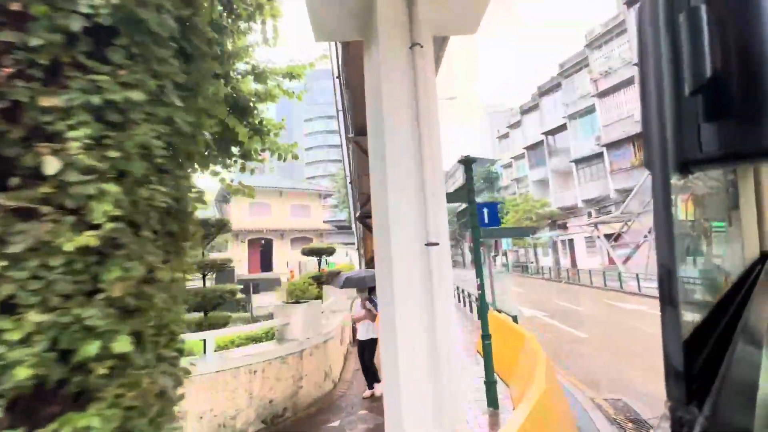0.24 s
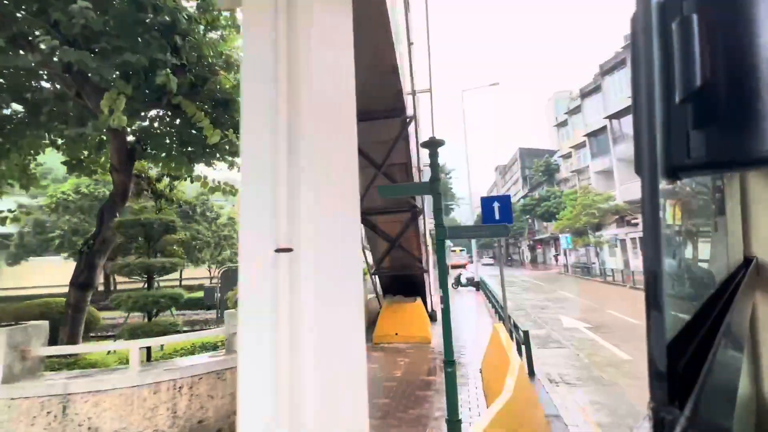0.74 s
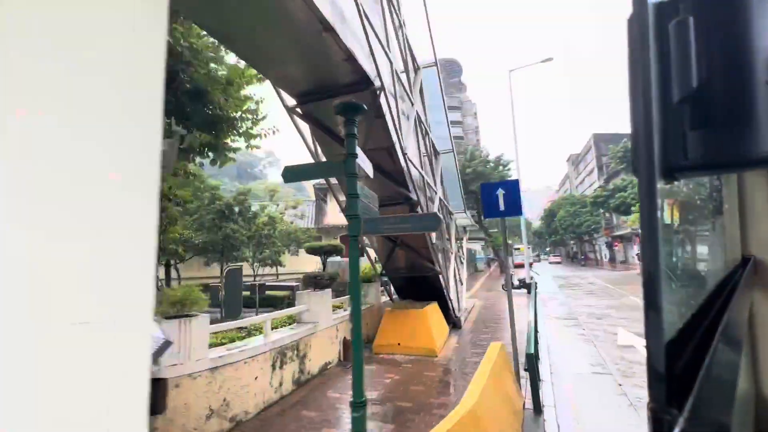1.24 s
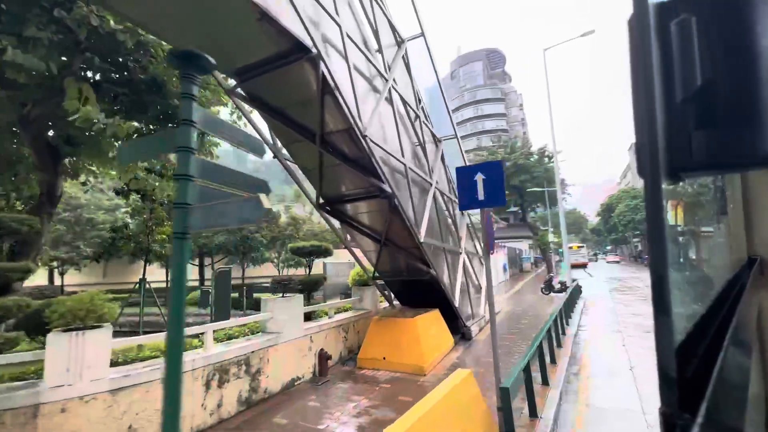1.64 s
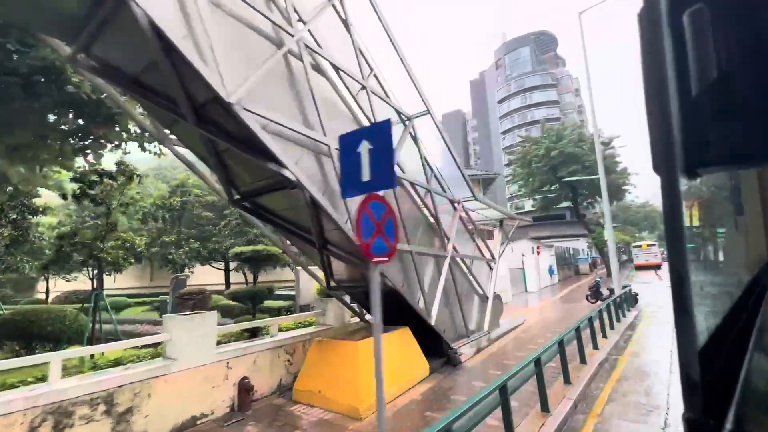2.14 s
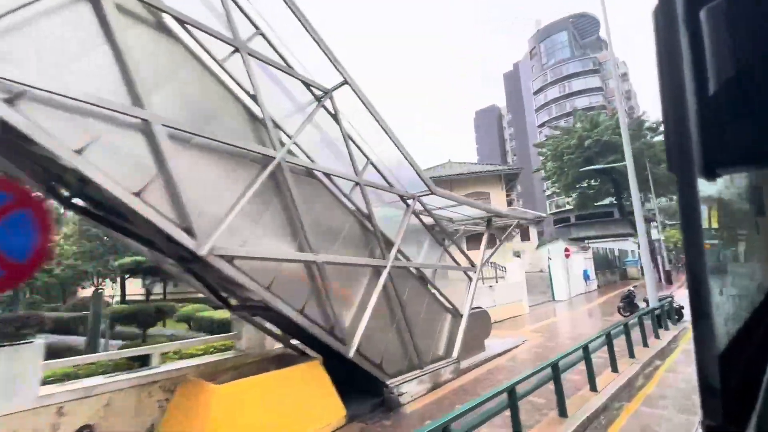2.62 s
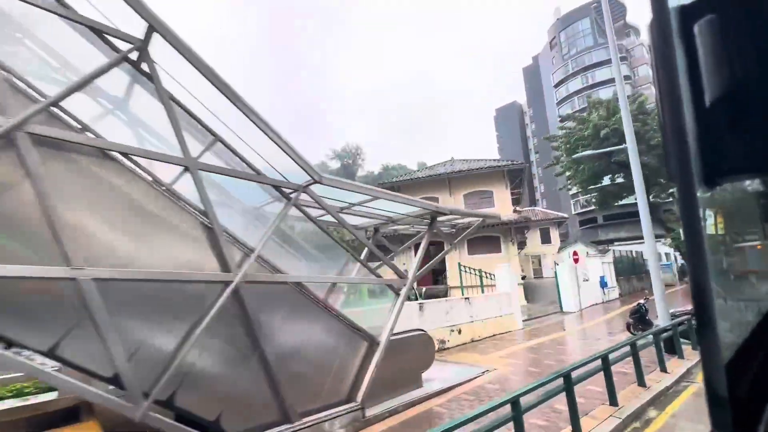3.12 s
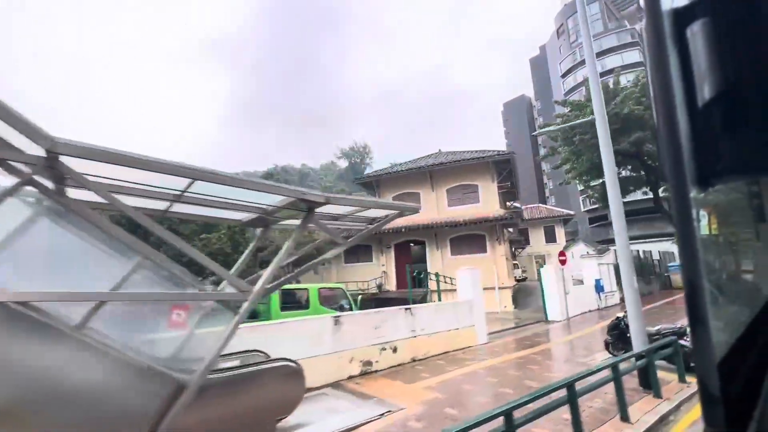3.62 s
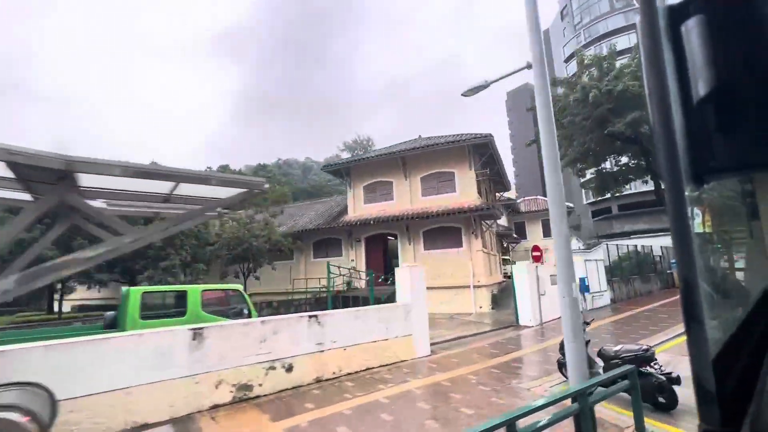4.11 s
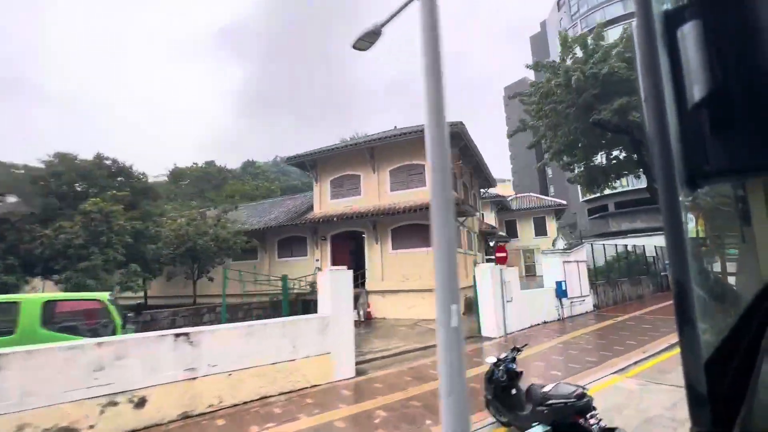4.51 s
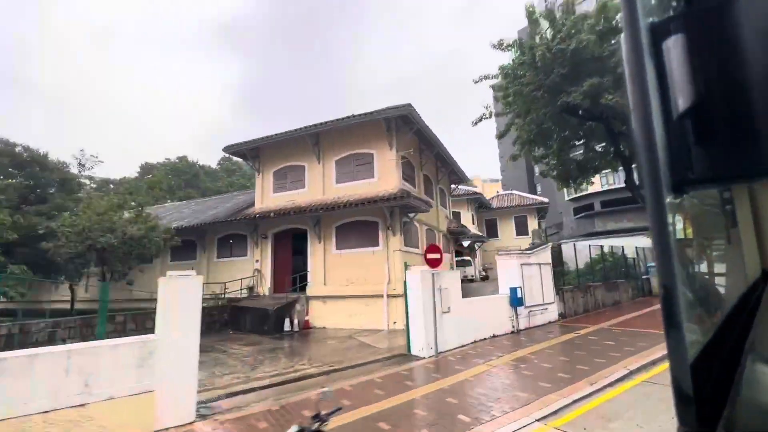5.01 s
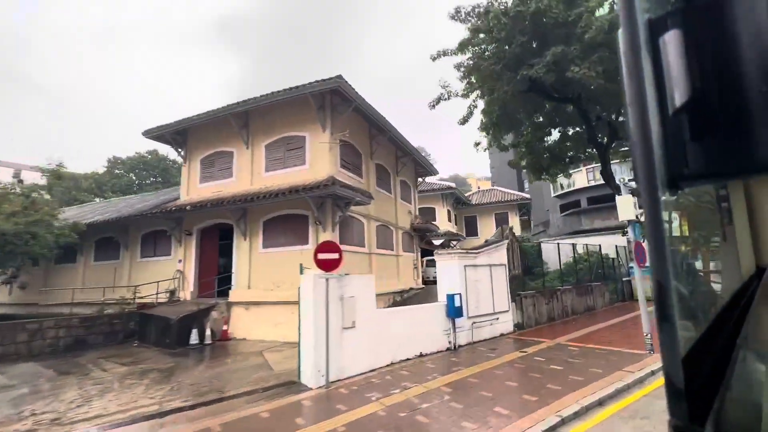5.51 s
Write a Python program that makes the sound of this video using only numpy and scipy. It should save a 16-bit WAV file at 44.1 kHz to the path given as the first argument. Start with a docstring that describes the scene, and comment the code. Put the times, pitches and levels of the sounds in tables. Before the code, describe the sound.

Inside a city bus, a diesel engine revs up with a growling drone and thin turbo whistle, then drops off to a quiet idle.

```python
"""On board a city bus on a wet street: the six-cylinder diesel revs up under load and holds.
Then the driver lifts off and it falls to idle. Sines that follow the crankshaft make the firing drone,
the uneven cylinders and the gear tones; two more sines make a sinking whine. Random noise, shaped in pitch
and level, makes the turbo whistle and the roar of body, tyres and air.
The stereo picture changes with pitch, and part of the treble is the same in both channels."""
import sys
import numpy as np
from scipy import signal
from scipy.fft import rfft, irfft, next_fast_len
from scipy.io import wavfile
from scipy.ndimage import uniform_filter1d, map_coordinates

SR = 44100
rng = np.random.default_rng(int(sys.argv[2]) if len(sys.argv) > 2 else 0)


def store_pcm(level_fs):
    """Save levels as 16-bit WAV."""
    pcm = np.round(np.clip(level_fs, -1, 1) * 32767).astype(np.int16)
    wavfile.write(sys.argv[1], SR, np.atleast_2d(pcm).T)


N = 253575
TIME = np.arange(N) / SR  # seconds

# How the engine runs. Each row: time in seconds, firing rate in Hz, firing tone in dB,
# body rumble in dB and engine clatter in dB (both before a fixed trim).
ENGINE_RUN = [(0.0, 62.24, -16, -26.5, -29), (0.25, 65.37, -11, -24.5, -27), (0.5, 70.6, -14, -27, -27.5),
              (0.65, 73.74, -17.5, -23.5, -27), (1.0, 81.45, -16, -28, -26),
              (1.25, 84.93, -14, -24.5, -25.5), (1.45, 86.4, -23.5, -25, -26.5),
              (1.75, 86.78, -22.5, -26.5, -26.5), (2.0, 84.35, -24.5, -23, -28),
              (2.15, 82.0, -16.5, -22, -28), (2.5, 80.26, -26.5, -22.5, -28.5),
              (2.75, 80.38, -17.5, -24.5, -29.5), (3.085, 78.27, -21.5, -21.5, -30.5),
              (3.135, 77.5, -29, -27.5, -30.5), (3.4, 75.1, -33, -29, -31), (3.75, 72.4, -42, -34, -32),
              (4.0, 66.7, -28, -28.5, -32.5), (4.25, 61.54, -52, -34, -33.5), (4.5, 52.33, -35, -35, -36),
              (4.68, 49.92, -45, -40, -35), (4.95, 49.2, -39, -29, -34.5), (5.2, 48.66, -48, -37, -36),
              (5.6, 49, -31, -31, -36), (5.75, 51.7, -44, -34, -35.5)]
# Pull of the engine under load. Each row: time in seconds, change of all gear tones in dB,
# change of the growl in dB, level of the cabin boom in dB.
UNDER_LOAD = [(0, -2.5, -6.5, -32), (.3, 2.5, -4.5, -33), (.55, -7, -2.5, -27), (.85, 3.5, 0, -27),
              (1.3, -1, -1.5, -28.5), (1.9, -2, 1, -25), (2.1, -3, 1, -26), (2.4, 0, -4.5, -23.5),
              (2.7, -16, -4, -29), (3.1, -9, -3, -28)]
# Speed of the turbo. Each row: time in seconds, whistle pitch in Hz, whistle level in dB.
TURBO_RUN = [(.65, 9200, -70), (.85, 9900, -45), (1.0, 10600, -45), (1.2, 11500, -42.5), (1.4, 12080, -44),
             (1.6, 12220, -35.5), (1.75, 12410, -38.5), (2.0, 12160, -42), (2.3, 11710, -48),
             (2.9, 11270, -44.5), (3.1, 10750, -52), (3.7, 9870, -51), (4.0, 9610, -85)]
# Ringing cabin panels. Each row: pitch in Hz, width in Hz, boost in dB before the floor is added.
CABIN_PANELS = [(147.5, 13.4, 8), (166.6, 16, -2), (210.6, 15, 4.5), (260.7, 14, 8), (320, 12, -0.5),
                (349, 21, 6), (561, 45, 6.5), (812, 46, 6)]

LIFT_END_S, LIFT_LENGTH_S = 3.135, 0.05  # the driver lifts off: end and length of the fade
LOADED_SHARE = np.clip((LIFT_END_S - TIME) / LIFT_LENGTH_S, 0, 1)  # 1 under load, 0 coasting


def gain_of(db):
    """Turns decibels into amplitude."""
    return 10 ** (np.asarray(db) / 20)


def evened(x):
    """Scales a signal to an rms of 1."""
    return x / np.sqrt(np.mean(x ** 2) + 1e-20)


def read(points, hz):
    """Reads a table of (Hz, value) on a logarithmic pitch axis."""
    f, value = np.transpose(points)
    return np.interp(np.log(hz + 1), np.log(f + 1), value)


def curves(rows):
    """Draws every column of a time table as one value per sample, held before and after its ends."""
    seconds, *columns = np.transpose(rows)
    return [np.interp(TIME, seconds, column) for column in columns]


def wander(rate_hz):
    """Slow random drift of rms 1: 16 sines with chance phases, up to the given rate."""
    t = TIME[::256]
    rates = rate_hz * np.geomspace(.1, 1, num=16)
    slow = sum(np.sin(2 * np.pi * (f * t + rng.random())) for f in rates)
    return np.interp(TIME, t, evened(slow))


def rings(modes, hz, floor_db):
    """Gain in dB of a set of resonances standing on a floor."""
    peaks = sum(gain_of(2 * db) / (1 + (2 * (hz - f) / width) ** 2) ** 2 for f, width, db in modes)
    return 10 * np.log10(peaks + gain_of(2 * floor_db))


def follow_clatter(full_load_db, db_per_db):
    """Level of a layer that moves in step with the engine clatter."""
    clatter_db = curves(ENGINE_RUN)[3]
    return full_load_db + db_per_db * (clatter_db + 26)  # clatter stands at -26 dB at full load


def noise(spectrum, patchy_db, size=1024):
    """Stereo noise of rms 1: random short-time spectra with drifting patches, coloured by the cabin."""
    # Stereo width by pitch: how alike the two channels are, fully alike from 10.4 to 13.7 kHz.
    # Each row: pitch in Hz, likeness from 0 to 1.
    likeness = [(60, 0.8), (200, 0.81), (550, 0.38), (950, 0.55), (1200, 0.38), (1600, 0.6), (2100, 0.57),
                (2600, 0), (3800, 0), (5100, 0), (6200, 0.35), (7000, 0.53), (8800, 0), (10200, 0.65),
                (10400, 1), (13700, 1), (13900, 1), (15500, 0.5)]
    frames = 4 * N // size + 5
    hz = np.fft.rfftfreq(size, 1 / SR)
    a, b, c, d, patches = rng.standard_normal((frames, len(hz), 5)).T
    patches = uniform_filter1d(patches, size=8, axis=0)  # spread over pitch
    patches = evened(uniform_filter1d(patches, size=8, axis=1))  # spread over time
    same = np.clip(read(likeness, hz), 0, 1)[:, None]
    left = a + 1j * b
    right = same * left + np.sqrt(1 - same ** 2) * (c + 1j * d)
    colour_db = read(spectrum, hz) + rings(CABIN_PANELS, hz, floor_db=5.0)
    stereo = np.array([left, right]) * gain_of(colour_db[:, None] + patchy_db * patches)
    stereo *= (hz >= spectrum[0][0])[:, None]  # nothing below the first row of the spectrum
    return evened(signal.istft(stereo, nperseg=size, noverlap=3 * size // 4)[1][:, :N])


def tone(turns, db, waver_db, rate_hz, slip):
    """A sine whose level wavers and whose phase slips, partly in its own way in each channel."""
    shared = turns + rng.random() + slip * wander(rate_hz)
    phase = 2 * np.pi * np.array([shared + 0.98 * slip * wander(rate_hz) for _ in "LR"])
    own_swing = np.array([wander(rate_hz) for _ in "LR"])
    swing_db = waver_db * (wander(rate_hz) + 0.29 * own_swing)
    return np.sqrt(2) * np.sin(phase) * gain_of(db + swing_db)


def engine():
    """Firing drone, uneven cylinders, growl and gear tones: sines at multiples of the four-stroke cycle."""
    # Brief dips of the drone. Each row: time in seconds, half length in seconds, depth in dB.
    dropouts = [(0.57, .03, -7.5), (0.689, 0.033, -12), (0.856, 0.027, -4.5), (1.44, 0.015, -2),
                (2.456, 0.023, -4), (2.68, 0.034, -1.5), (3.012, 0.018, -14)]
    # Uneven cylinders: multiples of the cycle rate.
    cycle_orders = [7, 8, 15, 16, 20, 22, 24, 25, 27, 30, 36, 39, 44]
    # Their levels in dB against the body rumble curve, before the cabin panels.
    cycle_levels = [-8.5, -25, -12.5, -19.5, -23, -15.5, -24, -18.5, -20.5, -19.5, -18, -29.5, -24]
    # Growl under load: multiples of the cycle rate.
    growl_orders = [4, 5, 9, 10, 11, 12, 13, 14, 18]
    # Their levels in dB before the load curve and the cabin panels.
    growl_levels = [-27, -28, -31.5, -36.5, -35, -30.5, -34.5, -36.5, -39.5]
    # Gear tones: multiples of the cycle rate.
    gear_teeth = [50, 57, 94, 100, 110, 138, 152]
    # Resonances where each gear sings, in the same order. Each row: pitch in Hz, width in Hz,
    # level in dB before the load curve.
    gear_sings = [
        [(530, 110, -36)],
        [(815, 40, -33.5)],
        [(1320, 70, -36)],
        [(1450, 81, -32)],
        [(1174, 54, -37), (1410, 120, -34), (1560, 99.7, -35)],
        [(1516, 70, -30.5), (1770, 119.4, -38)],
        [(1680, 120, -40)],
    ]

    firing_hz, firing_db, body_db, _ = curves(ENGINE_RUN)
    gears_db, growl_db, _ = curves(UNDER_LOAD)
    cycle_hz = firing_hz / 6  # six cylinders fire in each cycle
    cycles = np.cumsum(cycle_hz) / SR
    dips_db = sum(db * np.exp(-((TIME - s) / half) ** 2) for s, half, db in dropouts)

    out = tone(6 * cycles, firing_db + dips_db, waver_db=0.0, rate_hz=12, slip=0.021)
    for order, db in zip(cycle_orders, cycle_levels):
        level_db = body_db + db + rings(CABIN_PANELS, order * cycle_hz, floor_db=-1.0)
        out += tone(order * cycles, level_db, waver_db=2.0, rate_hz=4, slip=0.079)
    # off load the growl and the gears fall silent
    for order, db in zip(growl_orders, growl_levels):
        panels_db = rings(CABIN_PANELS, order * cycle_hz, floor_db=-2.0)
        level_db = db + growl_db + 0.46 * dips_db + panels_db
        out += LOADED_SHARE * tone(order * cycles, level_db, waver_db=3.0, rate_hz=5, slip=0.055)
    for teeth, sings in zip(gear_teeth, gear_sings):
        level_db = gears_db + rings(sings, teeth * cycle_hz, floor_db=-56)
        out += LOADED_SHARE * tone(teeth * cycles, level_db, waver_db=2.2, rate_hz=14, slip=0.045)
    return out


def cabin_boom():
    """Deep noise of the cabin, set by the load and dropping to a fixed level when coasting."""
    # Colour of the boom. Each row: pitch in Hz, relative level in dB.
    boom_spectrum = [(18, -40), (30, -20), (45, 3), (62, 10.5), (80, 10.5), (100, -7), (130, -37.5)]
    coasting_db = -36.5
    boom_db = coasting_db + (curves(UNDER_LOAD)[2] - coasting_db) * LOADED_SHARE
    return gain_of(boom_db + 1.5 * wander(3)) * noise(boom_spectrum, patchy_db=2.6, size=4096)


def body_rumble():
    """Low noise of the bus body, rising and falling with the engine."""
    # Colour of the rumble. Each row: pitch in Hz, relative level in dB.
    body_spectrum = [(70, -48), (100, -1.5), (147, 1.5), (190, -5), (260, -5.5), (390, -13.5), (520, -13),
                     (700, -41)]
    body_db = curves(ENGINE_RUN)[2]
    return gain_of(body_db - 3.0) * noise(body_spectrum, patchy_db=3.0, size=2048)


def clatter():
    """Engine clatter: noise that pulses a little with each firing."""
    # Colour of the clatter. Each row: pitch in Hz, relative level in dB.
    clatter_spectrum = [(300, 1.5), (420, -0.5), (570, -1.5), (690, -3.5), (810, -3), (1050, -4),
                        (1450, -4), (1750, -4), (2000, -4.5), (2550, -10.5), (2850, -9), (3300, -21),
                        (4200, -28.5)]
    firing_hz, _, _, clatter_db = curves(ENGINE_RUN)
    knock = 1 + 0.042 * np.cos(2 * np.pi * np.cumsum(firing_hz) / SR)
    return gain_of(clatter_db + 1.46) * knock * noise(clatter_spectrum, patchy_db=1.53, size=2048)


def casing_ringing():
    """Noise shaped by the resonances of the gear casing; it fades fast as the clatter falls."""
    # Resonances of the gear casing. Each row: pitch in Hz, width in Hz, relative level in dB.
    casing_modes = [(1400, 97, 0), (1480, 79, 0), (1513, 33, 2), (1610, 63, -8), (1570, 36, 5),
                    (1780, 25, -17), (2003, 90, -4.5), (2206, 160, -3.5), (2800, 250, -9),
                    (4210, 99, -10.5)]
    spectrum = [(hz, rings(casing_modes, hz, floor_db=-25)) for hz in np.arange(1200, 4500, 30)]
    spectrum += [(5000, -60)]  # falls away above the resonances
    level_db = follow_clatter(full_load_db=-29.5, db_per_db=3.2)
    return gain_of(level_db) * noise(spectrum, patchy_db=2.5, size=2048)


def turbo():
    """Turbulent air at the blade rate: a narrow core and a wide skirt of noise carried on a moving pitch."""
    hz, db = curves(TURBO_RUN)
    grain = rng.standard_normal((2, 2, N // 8))
    width_hz = 0.026 * hz  # a share of the pitch
    at = np.cumsum(width_hz) / SR  # one new random value per cycle of the width
    re, im = (map_coordinates(core, [at]) + .6 * map_coordinates(skirt, [2.6 * at]) for core, skirt in grain)
    turn = 2 * np.pi * np.cumsum(hz) / SR
    whistle = evened(re * np.cos(turn) + im * np.sin(turn))
    return gain_of(db + 1.1 * wander(23)) * whistle


def whine():
    """Two wavering sines that sink together with the road speed."""
    # Each row: time in seconds, pitch in Hz, lower strand in dB, upper strand in dB.
    whine_run = [(2.0, 1726, -55, -60), (2.2, 1683, -39, -56), (2.4, 1658, -33.5, -58),
                 (2.55, 1644, -53, -58), (2.8, 1611, -41, -56), (3.0, 1575, -48, -44),
                 (3.2, 1515, -36, -49), (3.5, 1452, -42.5, -49), (3.7, 1398, -37, -42),
                 (4.03, 1287, -40, -58), (4.15, 1250, -67, -60)]
    hz, low_db, high_db = curves(whine_run)
    turns = np.cumsum(hz) / SR
    low = tone(turns, low_db, waver_db=1.3, rate_hz=12, slip=0.08)
    high = tone(1.165 * turns, high_db, waver_db=5.0, rate_hz=14, slip=0.1)
    return (low + high) * (low_db > -59)  # both stop once the lower strand is this faint


def hiss():
    """Bright noise that flutters slightly and follows the clatter."""
    # Colour of the hiss. Each row: pitch in Hz, relative level in dB.
    hiss_spectrum = [(2800, -2.5), (3500, 2.5), (4200, 3.5), (4800, 2), (5900, 0.5), (6800, -7.5),
                     (8100, -6), (9300, -9), (10400, -5), (11800, -14), (13000, -26), (15600, -11)]
    level_db = follow_clatter(full_load_db=-34, db_per_db=0.87)
    return gain_of(level_db + 0.42 * wander(15)) * noise(hiss_spectrum, patchy_db=1.5)


def rush():
    """Thin hiss of intake air that grows with the speed of the turbo."""
    # Colour of the rush. Each row: pitch in Hz, relative level in dB.
    rush_spectrum = [(10500, -20), (12000, -4), (13000, 0.1), (14800, 0.1), (15600, -10)]
    whistle_hz = curves(TURBO_RUN)[0]
    level_db = -50 + 8 * (whistle_hz - 12500) / 1000  # 8 dB for each kHz of whistle pitch
    return gain_of(level_db) * noise(rush_spectrum, patchy_db=0.0)


def road():
    """Steady broad noise of the road, which follows the clatter only a little."""
    # Colour of the road noise. Each row: pitch in Hz, relative level in dB.
    road_spectrum = [(25, -16), (60, -0.5), (114, 4.5), (140, -6), (290, -6.5), (500, -17), (770, -9),
                     (1100, -11), (2000, -21), (3100, -24), (8000, -30), (10500, -33), (15600, -57)]
    level_db = follow_clatter(full_load_db=-33, db_per_db=0.25)
    return gain_of(level_db) * noise(road_spectrum, patchy_db=0.6, size=2048)


def scene():
    """Adds up all sources in two channels."""
    out = engine() + cabin_boom() + body_rumble() + clatter() + casing_ringing()
    return out + turbo() + whine() + hiss() + rush() + road()


def record(dry):
    """Sets phase and level between the channels, cuts narrow dips, softens the top and limits the band."""
    # Two narrow dips, and a softening of the top treble near the band limit.
    # Each row: pitch in Hz, width in Hz, depth in dB.
    treble_cuts = [(5200, 55, -19), (7520, 126, -17), (15900, 350, -12)]
    # Phase between the channels. Each row: pitch in Hz, radians by which the right one lags
    # (whole turns, so no shift, from 10.4 to 13.7 kHz).
    channel_phase = [(0, 0), (1460, 5.1), (1810, 4.9), (2500, 7.9), (3100, 8.4), (5940, 18.7), (6630, 18.8),
                     (8180, 27.1), (9130, 29), (9390, 26.2), (10250, 26), (10400, 8 * np.pi),
                     (13700, 8 * np.pi), (13900, 24.4), (15200, 22.6)]
    # Level between the channels. Each row: pitch in Hz, left minus right in dB.
    channel_tilt = [(60, 4), (99, 1.5), (160, 3), (270, 1), (450, 6), (740, 4.5), (1220, 0.5), (2010, 2),
                    (3330, 2.5), (5500, 1.0), (9080, -2.5), (15000, 1.5)]
    size = next_fast_len(N + 4096)
    hz = np.fft.rfftfreq(size, 1 / SR)
    cuts_db = sum(db * np.exp(-((hz - f) / width) ** 2) for f, width, db in treble_cuts)
    tilt_db = np.outer([.5, -.5], read(channel_tilt, hz))
    f, phase = np.transpose(channel_phase)
    lag = np.outer([0, 1], np.interp(hz, f, phase))  # only the right channel is turned
    response = gain_of(cuts_db + tilt_db) * np.exp(-1j * lag)
    heard = irfft(rfft(dry, size) * response, size)[:, :N]
    low_pass = signal.firwin(1023, 15730, window=("kaiser", 9), fs=SR)  # cutoff in Hz
    return signal.oaconvolve(heard, low_pass[None], "same")


dry = scene()
out = record(dry)
store_pcm(out)
```